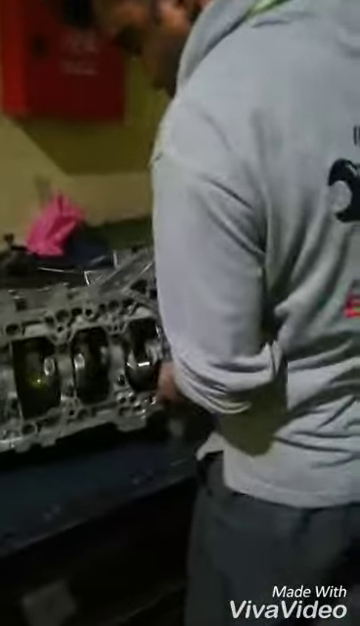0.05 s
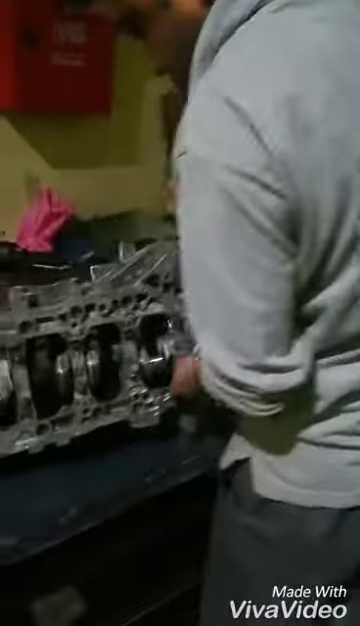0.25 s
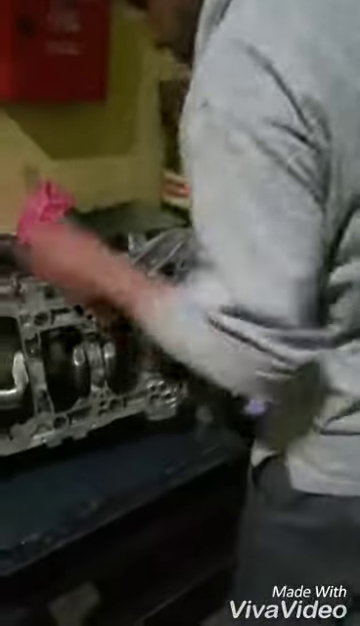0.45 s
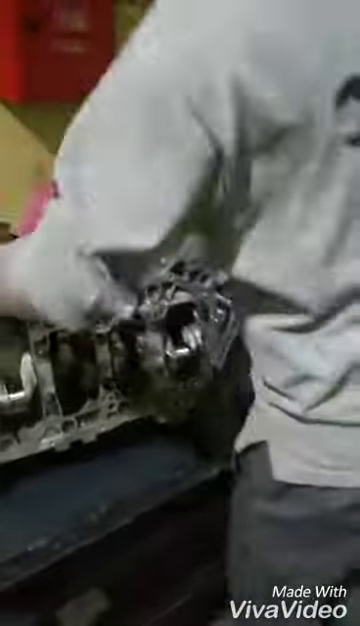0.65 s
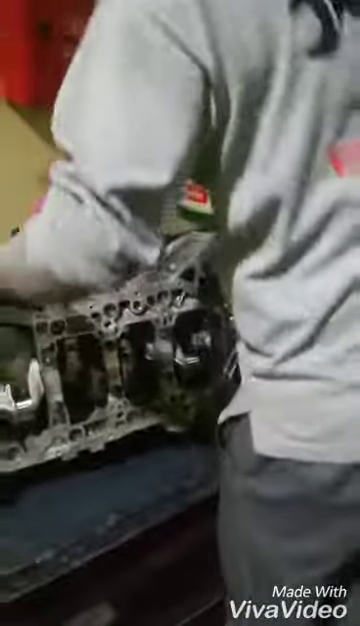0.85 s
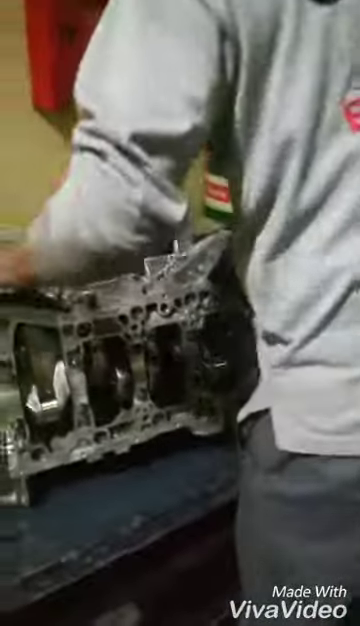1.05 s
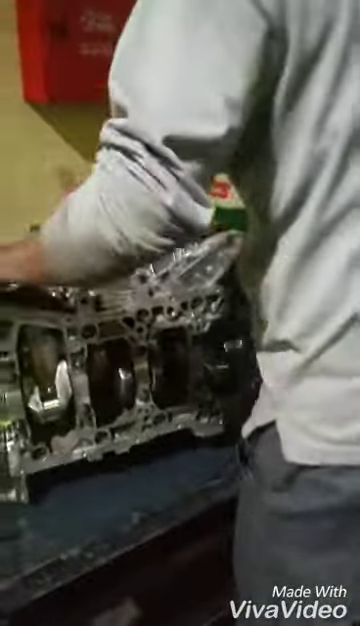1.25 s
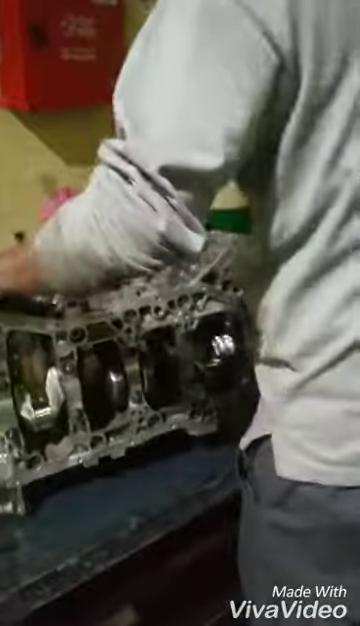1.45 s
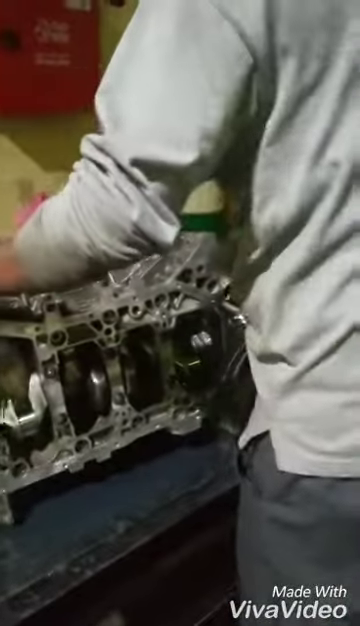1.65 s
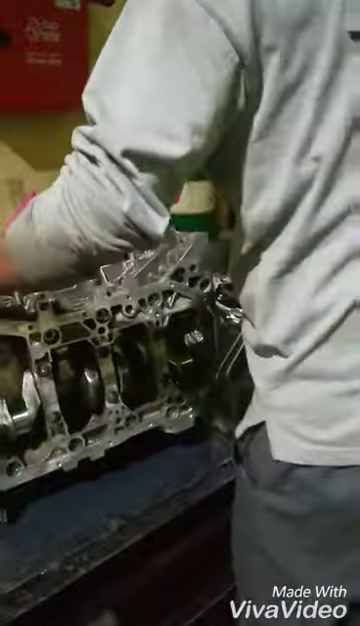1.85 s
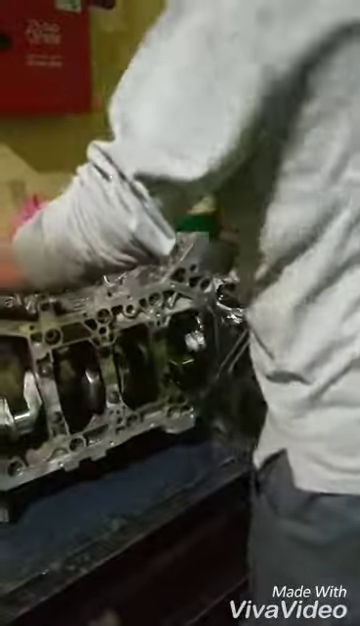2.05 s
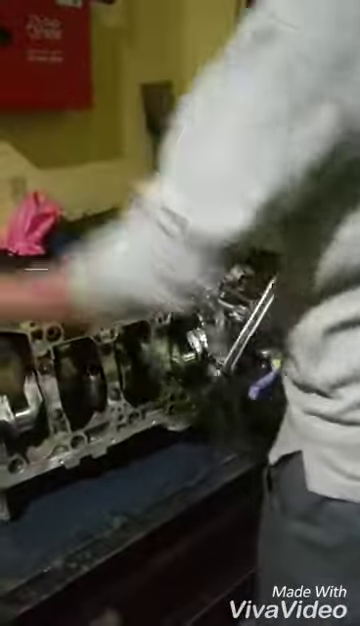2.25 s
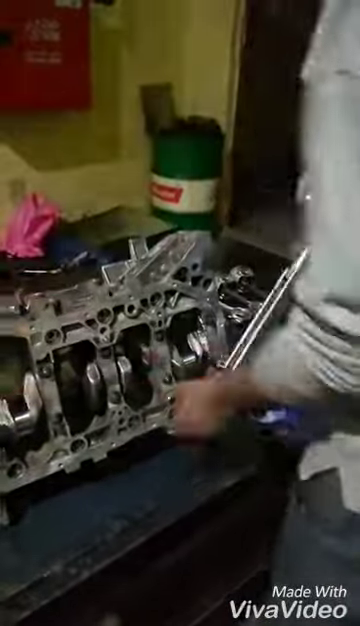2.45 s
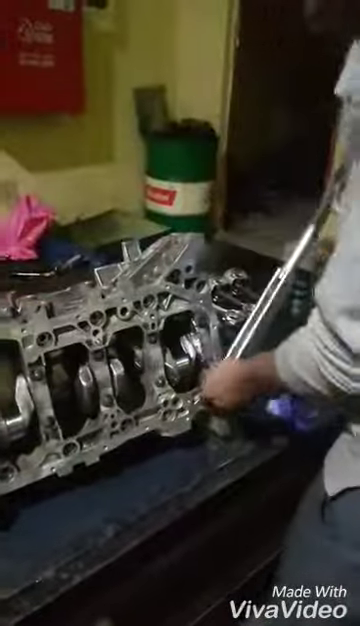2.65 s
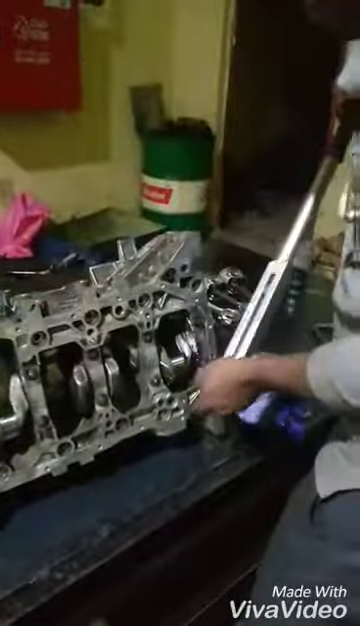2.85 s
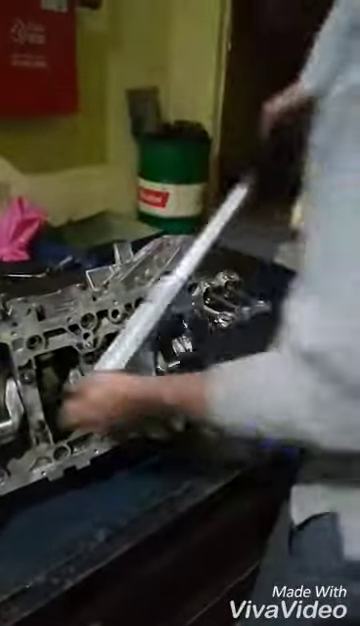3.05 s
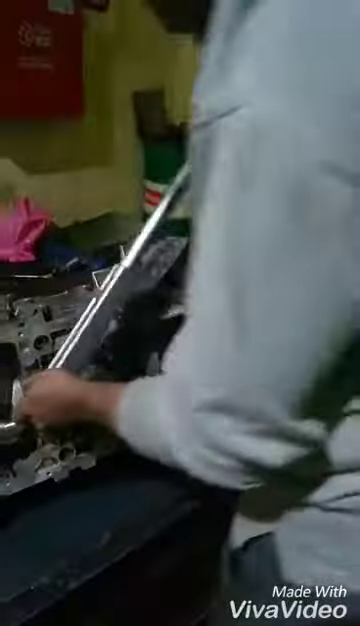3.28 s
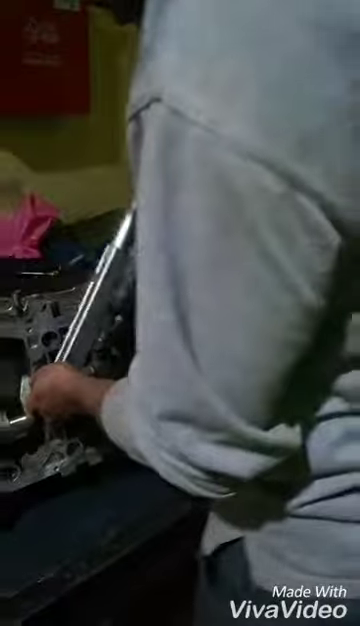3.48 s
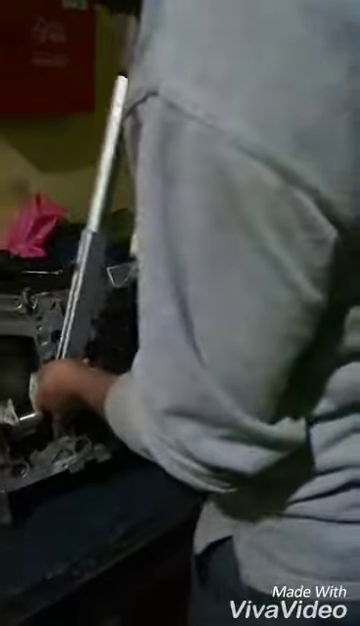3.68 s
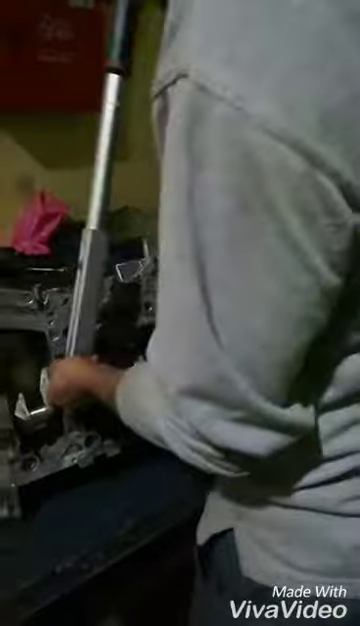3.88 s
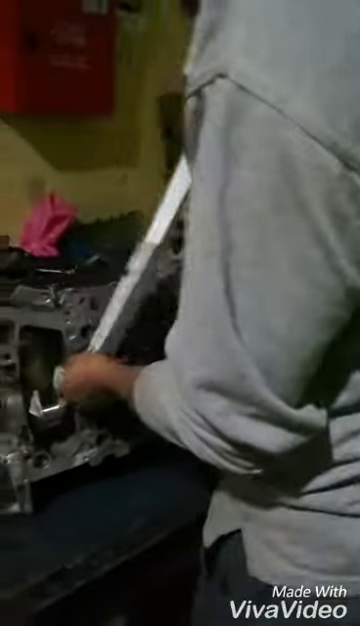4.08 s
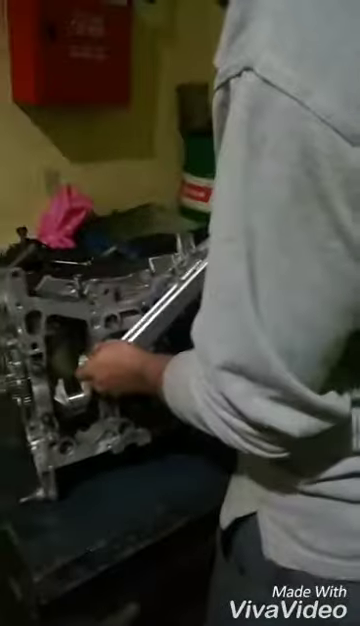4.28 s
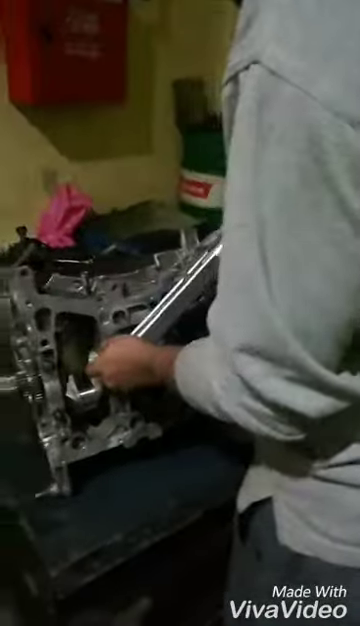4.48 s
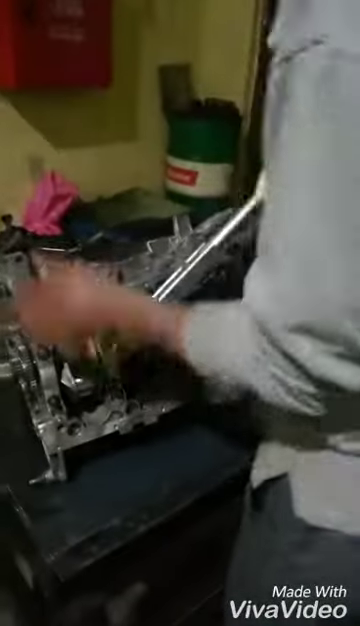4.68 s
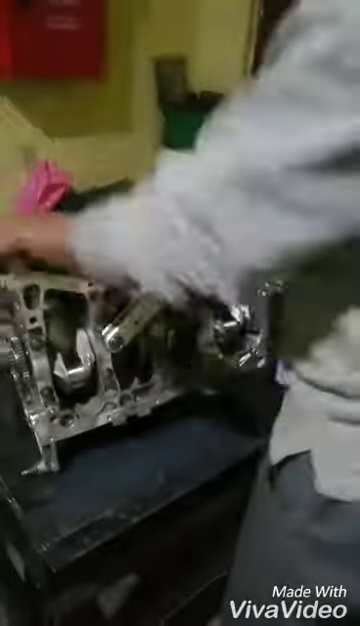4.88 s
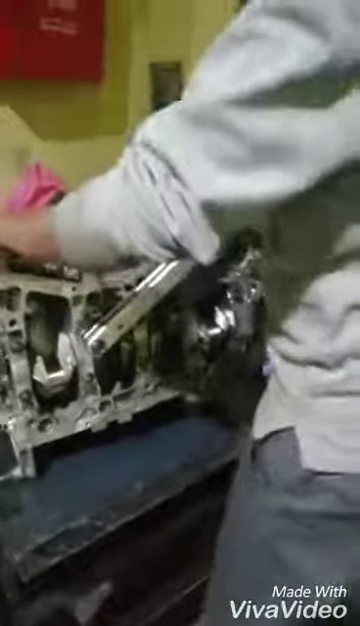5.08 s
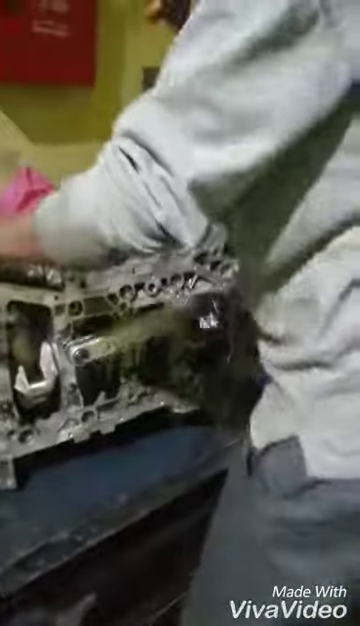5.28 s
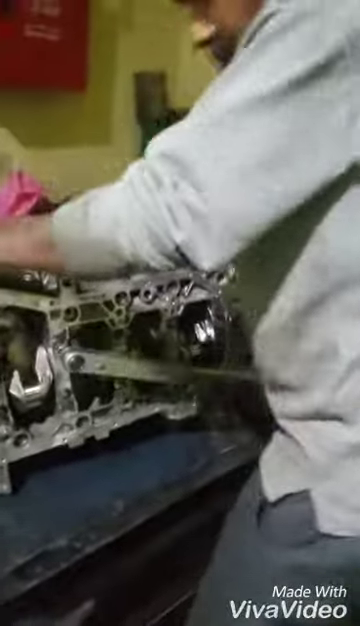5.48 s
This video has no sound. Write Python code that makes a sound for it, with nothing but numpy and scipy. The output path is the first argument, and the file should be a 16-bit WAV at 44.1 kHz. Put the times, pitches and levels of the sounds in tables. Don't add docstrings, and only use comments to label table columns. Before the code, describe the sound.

Close stereo pickup of a torque wrench working on a metal engine block. Sleeves rustle over a low steady engine hum, then an abrupt, overloading crack and several hard metallic snaps ring off the walls in about a second. The recording level ducks, so the hum becomes faint. Quiet ratchet ticks, light seating clicks and a medium clack follow, then a bright snap with a hollow bench ring and a brief rising creak.

```python
import sys
import numpy as np
from scipy import signal
from scipy.io import wavfile
from scipy.ndimage import uniform_filter1d

SR = 44100
rng = np.random.default_rng(int(sys.argv[2]) if len(sys.argv) > 2 else 0)


def makeup_ratio(level_db):
    decades = np.asarray(level_db, float) / 20
    return 10 ** decades


def inscribe(sig):
    pcm = np.round(np.clip(np.atleast_2d(sig).T, -1, 1) * 32767)
    wavfile.write(sys.argv[1], SR, pcm.astype(np.int16))


N = 243431


def rms_one(x):
    return x / np.sqrt(np.mean(x ** 2) + 1e-20)


def in_time(rows):
    s, *columns = np.transpose(rows)
    return [np.interp(np.arange(N) / SR, s, c) for c in columns]


def at_hz(points, hz):
    table_hz, values = np.array(points).T
    return np.interp(np.log(hz), np.log(table_hz), values)


def band(x, low_hz, high_hz):
    sos = signal.butter(3, [low_hz, min(high_hz, .45 * SR)], "band", fs=SR, output="sos")
    return signal.sosfilt(sos, x)


def drift(rate_hz):
    pole = np.exp(-80 * np.pi * rate_hz / SR)
    white = rng.standard_normal(N // 40 + 2002)
    slow = signal.lfilter([1], [1, -2 * pole, pole * pole], white)[2000:]
    return np.interp(np.arange(N) / 40, np.arange(len(slow)), rms_one(slow))


def sides(pan_db):
    return makeup_ratio(np.array([pan_db / 2, -pan_db / 2]))


def swells(s, hold_s, db, rise_db_per_s, fall_db_per_s):
    t = np.arange(0, N + 32, 32)[:, None] / SR - s
    rising_db = np.minimum(rise_db_per_s * t, 0)
    falling_db = fall_db_per_s * np.maximum(t - hold_s, 0)
    power = makeup_ratio(db + rising_db - falling_db) ** 2
    return np.interp(np.arange(N) / 32, np.arange(len(t)), np.sqrt(power.sum(axis=1)))


def tilt_db(hz, treble_db, low_db):
    below = np.clip(np.log(2900 / hz) / np.log(2900 / 1200), 0, 1)
    above = np.clip(np.log(hz / 4200) / np.log(12000 / 4200), 0, None)
    return below * (low_db + 8.5) + above * (treble_db + 12.5)


# start in seconds, peak in dB, treble in dB, own mode in Hz, its level in dB,
# kind of blow.
BLOWS = [(1.1013, 2, -13.5, 2660, -4.5, "crack"), (1.6576, -31.5, -22, 1625, 8, "knock"),
         (1.6998, -5, -15, 6450, -11, "snap"), (1.9854, -5.5, -18, 5300, 2.5, "snap"),
         (2.1461, -5.5, -14, 2120, -9, "clack"), (3.3008, -25, -26.5, 2508, -5, "seat"),
         (3.4486, -59, -12, 8600, -3, "seat"), (3.494, -47, -38, 3365, -3, "seat"),
         (3.8209, -47.5, -25.5, 2290, 3.5, "knock"), (3.8347, -32.5, -42, 4200, -1.5, "scuff"),
         (4.2068, -21, -21, 3050, 2.5, "clack"), (4.5112, -51.5, -44, 1380, 0, "knock"),
         (5.1669, -12, -12, 10820, 2, "release")]
BLOW_KINDS = {"crack": (-19.5, -21, -8), "snap": (-15, -18, -6.5), "release": (-21, -26.5, -11.5),
              "seat": (-30, -19, -3), "clack": (-16, -20.5, -4), "scuff": (-27, -15, -6),
              "knock": (-5.5, -11.5, -0.85)}
LANDING_DB = {"crack": (-8, -12, -7, 1.5, -5), "snap": (-10, -1.5, -2.5, -4, -3),
              "seat": (4.5, -6, 1.5, -10, -9), "release": (5, -12, 3, -12, 2.5),
              "clack": (-4, 2.5, -6, -12, -7), "scuff": (0.5, 6.5, -8, 0.5, -1.5),
              "knock": (5, -6, -11, -6, 3)}


def blows():
    character = [BLOW_KINDS[row[-1]] for row in BLOWS]
    landing_db = np.array([LANDING_DB[row[-1]] for row in BLOWS])
    return np.c_[[row[:-1] for row in BLOWS], character], landing_db


# frequency in Hz, level in dB.
HEAD_COLOUR_DB = [(900, -15.5), (1300, -3), (2000, -2), (2800, -2), (4600, -0.5), (6000, 8), (7200, 2.5),
                  (9400, -0.5), (11500, 1.5), (13500, -3), (16000, -13.5)]
# frequency in Hz, 60 dB decay in seconds.
HEAD_DECAY = [(1000, 0.022), (3000, 0.044), (6000, 0.012), (12000, 0.021), (16000, 0.025)]
# frequency in Hz, 60 dB decay in seconds.
HANDLE_MODES = [(2935, 0.035), (3330, 0.016), (3880, 0.054), (4680, .04), (5245, 0.035)]
HANDLE_DB = 11.5
OWN_CYCLES = 210


def snaps(gain_db):
    near = np.zeros((2, N))
    size, count = 3000, 150
    t = np.arange(size) / SR
    attack = np.sin(np.clip(t / .0004, 0, 1) * np.pi / 2) ** 2
    handle_hz, handle_t60 = np.transpose(HANDLE_MODES)
    for row, struck_db in zip(*blows()):
        s, peak_db, treble_db, own_hz, own_db, low_db, room_db, pan_db = row
        chance = rng.random((count + 6, 4))
        crowd_hz = 900 + 15000 * chance[:count, 0]
        crowd_db = at_hz(HEAD_COLOUR_DB, crowd_hz) + tilt_db(crowd_hz, treble_db, low_db)
        crowd_t60 = at_hz(HEAD_DECAY, crowd_hz) * (.55 + .9 * chance[:count, 1])
        hz = np.r_[crowd_hz, own_hz, handle_hz]
        db = np.r_[crowd_db, own_db + HANDLE_DB, struck_db + HANDLE_DB]
        t60 = np.r_[crowd_t60, OWN_CYCLES / own_hz, handle_t60]
        decay = makeup_ratio(db[:, None] - 60 * t / t60[:, None]) * attack
        phase = 2 * np.pi * (hz[:, None] * (t - .0007) + .7 * chance[:, 2:3])
        lead = 2.816 * (chance[:, 3:] - .5) + 1.3
        beam = sides(pan_db * (0.14 + (hz / 9000) ** 2.0))
        left = beam[0] @ (decay * np.sin(phase))
        right = beam[1] @ (decay * np.sin(phase + lead))
        pair = band(np.array([left, right]), 1050, 17000)
        at = round(s * SR)
        near[:, at:at + size] += makeup_ratio(peak_db + 6.5 - gain_db[at]) * pair / np.abs(pair.mean(axis=0)).max()
    return near


# delay in seconds, level in dB.
WALL_REFLECTIONS = [
    (.0135, -18),
    (.0185, -29.5),
    (.037, -23.5),
]


def echoes(x):
    dull = signal.lfilter([.6], [1, -.4], x)
    out = 0
    for k, (lag_s, db) in enumerate(WALL_REFLECTIONS):
        out = out + makeup_ratio(db) * np.roll(dull[::(-1) ** k], round(lag_s * SR), axis=1)
    return out


def dying(at, db, t60):
    early_db, early_t60 = 8.5, .13
    energy = np.full(N, 1e-18)
    energy[at] = makeup_ratio(db) ** 2
    late = signal.lfilter([1], [1, -makeup_ratio(-120 / (t60 * SR))], energy)
    early = makeup_ratio(early_db) ** 2 * signal.lfilter([1], [1, -makeup_ratio(-120 / (early_t60 * SR))], energy)
    return np.sqrt(signal.lfilter([.005], [1, -.995], late + early))


# frequency in Hz, 60 dB decay in seconds.
ROOM_DECAY = [(1000, 0.35), (2500, 0.86), (5000, 1), (8000, 0.73), (11000, 0.73), (13500, .55),
              (16000, 0.36)]
# frequency in Hz, level in dB.
ROOM_COLOUR_DB = [(1000, -1), (1800, -5), (2500, -3), (3500, -5), (5000, -3), (6500, -4), (8000, 1),
                  (10000, -11), (12500, -6), (15000, -8.5)]
# frequency in Hz, left over right in dB.
ROOM_LEAN_DB = [(1000, -2), (4000, 5.5), (12000, -5)]
HANDLE_ROOM_DB = -1.5


def workshop(gain_db):
    rows, landing_db = blows()
    s, peak_db, treble_db, own_hz, own_db, low_db, room_db, pan_db = rows.T
    at, tail = np.round(s * SR).astype(int), 0
    fed_db = peak_db + room_db - gain_db[at]
    white = rng.standard_normal((3, 2, N))
    for k, low_hz in enumerate(780 * 2 ** (np.arange(13) / 3)):
        hz = low_hz * 1.12
        band_db = fed_db + at_hz(ROOM_COLOUR_DB, hz) + 1.4 * tilt_db(hz, treble_db, low_db)
        level = dying(at, band_db, at_hz(ROOM_DECAY, hz))
        noise = band(white[k % 2], low_hz, low_hz * 2 ** (1 / 3))
        tail = tail + noise * level * sides(at_hz(ROOM_LEAN_DB, hz))[:, None]
    for (hz, _), struck_db in zip(HANDLE_MODES, landing_db.T):
        level = dying(at, fed_db + struck_db + HANDLE_ROOM_DB, .7 * at_hz(ROOM_DECAY, hz))
        tail = tail + band(white[2], hz - 170, hz + 170) * level
    for i, hz in enumerate(own_hz):
        level = dying(at[i], fed_db[i] + own_db[i] + HANDLE_ROOM_DB + 2, 3 * OWN_CYCLES / hz)
        tail = tail + band(white[2], hz - 110, hz + 110) * level
    return tail


# start in seconds, pitch in Hz.
BENCH_RING = (5.188, 740)


def knock():
    s, hz = BENCH_RING
    t = np.clip(np.arange(N) / SR - s, 0, None)
    level_db, t60 = -54.5, 0.16
    attack = np.clip(t / 0.0034, 0, 1)
    return makeup_ratio(level_db - 60 * t / t60) * np.sin(2 * np.pi * hz * t) * attack


# start in seconds, peak in dB, left over right in dB, lowest Hz.
RATCHET_TICKS = [(0.0401, -41, -18, 5600), (0.5651, -37, -16, 5600), (3.0092, -45.5, -6, 5640),
                 (4.0319, -62, 0.5, 5650), (4.0442, -47, -14, 3600), (4.0554, -50, -8.5, 5600),
                 (4.0694, -36.5, -13.5, 5700), (4.4626, -49, 0.5, 5560), (4.4937, -40.5, -15.5, 5560),
                 (4.8964, -52, -9, 5570), (4.9751, -52.5, -22.5, 5600), (5.3214, -47, -6, 5600)]


def ticks():
    out = np.zeros((2, N))
    size = 512
    decay = np.exp(-np.arange(size) / SR / 0.00069)
    for s, peak_db, pan_db, low_hz in RATCHET_TICKS:
        tick = band(rng.standard_normal(size) * decay, low_hz, 28000)
        at = round(s * SR)
        out[:, at:at + size] += makeup_ratio(peak_db) * tick / np.abs(tick).max() * sides(pan_db)[:, None]
    return out


# start in seconds, hold in seconds, level in dB, top band over it in dB.
SLEEVE_SWISHES = [(0.047, 0.0051, -52, -15), (0.35, .08, -50, -18), (0.447, 0.065, -33, -14.5),
                  (0.537, .1, -47, -20), (0.656, .02, -42.5, -14), (0.795, .1, -55, -21),
                  (0.913, .17, -46, -32), (1.015, 0.024, -49, -16), (3.029, 0.012, -61, -3.5),
                  (3.159, 0.0075, -61.5, -13), (4.519, 0.019, -54, -19.5), (4.569, 0.044, -53.5, -22),
                  (4.716, .015, -72, 0), (4.812, .06, -66, -19.5), (5.049, 0.023, -63.5, -12.5)]


def rustle():
    grain_db = 1.7 * np.minimum(rng.exponential(1, (2, 2, N)), 4)
    grains = rng.standard_normal((2, 2, N)) * makeup_ratio(grain_db)
    mid = rms_one(band(grains[0], 3700, 6100) + 1.2 * band(grains[0], 2900, 4700))
    top = rms_one(band(grains[1], 8400, 18000))
    s, hold_s, db, top_db = np.transpose(SLEEVE_SWISHES)
    slopes = 600, 400
    return swells(s, hold_s, db - 9.0, *slopes) * mid + swells(s, hold_s, db + top_db, *slopes) * top


# time in seconds, slip rate in Hz, level in dB.
BOLT_CREAK = [
    (5.46, 260, -71.5),
    (5.49, 326.4, -59),
    (5.51, 341.3, -51.5),
    (5.52, 401, -49),
]


def creak():
    rate_hz, level_db = in_time(BOLT_CREAK)
    turn = 2 * np.pi * np.cumsum(rate_hz) / SR
    stack = np.sin(turn)
    for k in range(2, 7):
        stack = stack + makeup_ratio(-8 - 1.72 * k + 3.1 * drift(61)) * np.sin(k * turn + k * k)
    started = np.arange(N) > BOLT_CREAK[0][0] * SR
    return makeup_ratio(level_db) * started * stack


# time in seconds, second order in Hz, its level in dB.
IDLE_CURVE = [(0.0, 79, -40.5), (0.15, 78.5, -43.5), (0.4, 78.4, -37.5), (1.1, 78.4, -41),
              (1.65, 78.3, -45.5), (1.8, 77.6, -46), (2.23, 77.4, -53.5), (2.3, 77.4, -66),
              (2.6, 77.3, -69), (2.74, 77.3, -62), (4.2, 77.3, -63), (5.1, 77.3, -71), (5.52, 79.5, -67.5)]
# multiple of the shaft rate, level in dB, moment in seconds when it is loudest.
UPPER_ORDERS = [(4.94, -19, 0.57), (6.06, -13.5, 1.9), (7, -16, 1.2), (8.03, -23.5, 0.12), (9, -13.5, 1.3),
                (10.01, -22, 0.44), (20.02, -20, 1.5), (34.18, -22.5, 0.36)]


def engine_tones(gain_db):
    t = np.arange(N) / SR
    second_hz, level_db = in_time(IDLE_CURVE)
    turn = np.pi * np.cumsum(second_hz) / SR
    tones = makeup_ratio(level_db - 0.5 * drift(9.4)) * np.sin(2 * turn + 0.48 * drift(0.9))
    upper_db = 1.3 * (uniform_filter1d(gain_db, size=8000) + 41) - 40
    swell_db, swell_s = 6, .4
    for order, db, loudest_s in UPPER_ORDERS:
        waver_db, wander = 2.2 * drift(2.5), .5 * drift(4)
        waver_db = waver_db + swell_db * np.exp(-((t - loudest_s) / swell_s) ** 2)
        tones = tones + makeup_ratio(db + upper_db + waver_db) * np.sin(order * turn + wander)
    fan_hz, fan_db = 141.4, -11.5
    fan_db = fan_db + 1.2 * (upper_db + 39.5) - 38.5 + 2.0 * drift(1.5)
    tones = tones + makeup_ratio(fan_db) * np.sin(2 * np.pi * fan_hz * t + 0.1 * drift(12))
    return np.sqrt(2) * tones


# start in seconds, hold in seconds, deep part in dB, hollow part in dB.
BENCH_THUDS = [(1.126, 0.0066, -25.5, -34), (1.173, 0.022, -38, -36), (1.408, 0.012, -71, -46),
               (1.666, 0.033, -33.5, -40.5), (1.733, 0.014, -29, -36.5), (2.014, 0.023, -36, -38.5),
               (2.087, .02, -55, -40.5), (2.157, 0.052, -37, -41.5), (3.494, .08, -67, -55),
               (4.24, 0.097, -58, -71.5), (4.354, 0.025, -65, -57), (4.483, 0.095, -49.5, -57),
               (4.62, 0.022, -67, -52.5), (4.689, 0.017, -51, -51.5), (4.74, 0.25, -69, -57),
               (5.189, 0.057, -49, -49), (5.32, 0.078, -54, -49.5), (5.442, .05, -73, -54.5),
               (5.52, .01, -62, -50.5)]


def thuds():
    _, level_db = in_time(IDLE_CURVE)
    lumpy_db = 5
    deep = rms_one(band(rng.standard_normal(N), 80.2, 125))
    white = rng.standard_normal(N)
    hollow = rms_one(band(white, 120, 277.5) + 0.6 * band(white, 172, 205))
    s, hold_s, deep_db, hollow_db = np.transpose(BENCH_THUDS)
    slopes = 503, 400.5
    deep_steady_db = level_db - 11 + lumpy_db * drift(4.3)
    hollow_steady_db = 0.69 * (level_db + 39) - 40.5 - 2 - 5.0 + lumpy_db * drift(2.8)
    deep = deep * (makeup_ratio(deep_steady_db) + swells(s, hold_s, deep_db - 7.0, *slopes))
    return deep + hollow * (makeup_ratio(hollow_steady_db) + swells(s, hold_s, hollow_db - 6.0, *slopes))


# centre in Hz, width in Hz, level in dB.
AIR_DUCT = (1170, 150, -77)


def duct():
    hz, width_hz, db = AIR_DUCT
    flutter_db = 3 * drift(18)
    hump = band(rng.standard_normal(N), hz - width_hz / 2, hz + width_hz / 2)
    return makeup_ratio(db + flutter_db) * rms_one(hump)


# frequency in Hz, left-right correlation.
PORT_LIKENESS = [(60, 0.96), (150, 1), (380, -0.077), (950, 0.5), (2380, 0.27), (5980, -0.07),
                 (15000, -0.49)]


def stereo_noise(spectrum, patchy_db, balance):
    out, white = 0, rng.standard_normal((2, 2, N))
    edges = spectrum[0][0] * np.sqrt(2) ** np.arange(20)
    for k, low_hz in enumerate(edges[edges < spectrum[-1][0]]):
        mid, side = band(white[k % 2], low_hz, low_hz * np.sqrt(2))
        hz = low_hz * 2 ** .25
        alike = np.clip(at_hz(PORT_LIKENESS, hz), -1, 1)
        pair = np.sqrt(1 + alike) * mid + np.sqrt(1 - alike) * side * [[1], [-1]]
        level = makeup_ratio(at_hz(spectrum, hz) + patchy_db * drift(2.0))
        out = out + level * pair * sides(at_hz(balance, hz))[:, None]
    return out


# frequency in Hz, level in dB per Hz.
RUMBLE_SPECTRUM = [(15, -38), (25, -10.5), (43, -14), (62, -13), (82, -0.5), (110, -12.5), (188, -8),
                   (293, -11), (357, -7), (457, -10.5), (1350, -14.5), (1450, -17.5), (2830, -28),
                   (3900, -30), (9000, -51), (11700, -88), (19800, -120)]
# frequency in Hz, left over right in dB.
BACKGROUND_LEAN_DB = [(60, 4.5), (110, -3.5), (200, 2.5), (380, -4.5), (700, -2), (1290, 2), (2380, 2.5),
                      (4400, 6.5), (8120, -2), (15000, 1)]


def rumble():
    x = stereo_noise(RUMBLE_SPECTRUM, 1.7, BACKGROUND_LEAN_DB)
    return x / np.std(band(x.mean(axis=0), 450, 1600))


def air(gain_db):
    level_db = -66.5 - 2.0 + .45 * (gain_db + 65.5)
    return makeup_ratio(level_db) * rms_one(band(rng.standard_normal(N), 14, 55))


# frequency in Hz, level in dB per Hz.
HISS_SPECTRUM = [(1180, -24.5), (2000, -5), (2620, -9.5), (3040, -6.5), (7570, -16.5), (14900, -16.5),
                 (16000, -11.5)]


def hiss(gain_db):
    level_db = -77.5 + 3.5 + .15 * (gain_db + 66)
    return makeup_ratio(level_db) * rms_one(stereo_noise(HISS_SPECTRUM, .3, BACKGROUND_LEAN_DB))


def whine():
    return makeup_ratio(-92 + 2.5 * drift(30)) * np.sin(2 * np.pi * 14406 * np.arange(N) / SR)


# time in seconds, level in dB.
GAIN_CURVE = [(0.0, -41), (0.3, -37.5), (1.03, -38.5), (1.19, -43.5), (1.68, -46), (1.8, -49),
              (2.17, -50.5), (2.42, -54), (2.46, -60.5), (2.82, -64), (3.2, -64.5), (4.3, -69),
              (4.47, -70.5), (4.65, -65.5), (5.08, -65.5), (5.4, -68.5), (5.52, -72)]


def scene():
    gain_db, = in_time(GAIN_CURVE)
    near = snaps(gain_db)
    gained = makeup_ratio(gain_db) * (near + echoes(near) + workshop(gain_db) + rumble() * makeup_ratio(-5.5))
    handling = knock() + ticks() + rustle() + creak()
    idling = engine_tones(gain_db) + thuds()
    return gained + handling + idling + duct() + air(gain_db) + hiss(gain_db) + whine()


def top_cut(x):
    return signal.sosfilt(signal.butter(12, 15600, fs=SR, output="sos"), x)


def record(dry):
    clipped = np.clip(dry, -1, 1)
    mix = signal.sosfilt(signal.butter(10, 15600, fs=SR, output="sos"), clipped)
    return top_cut(mix)


dry = scene()
out = record(dry)
inscribe(out)
```